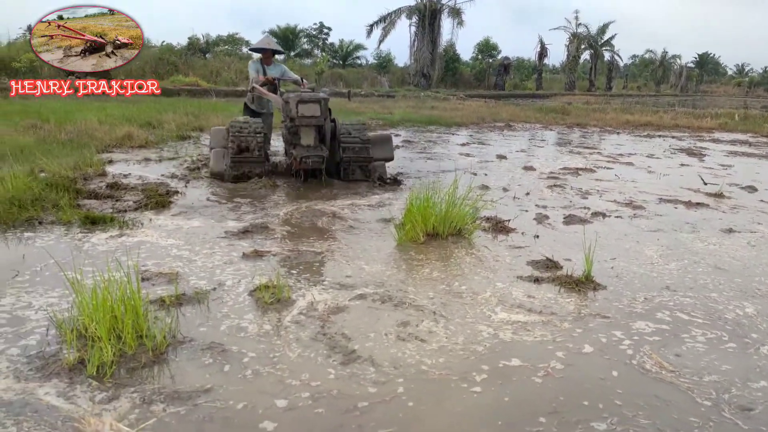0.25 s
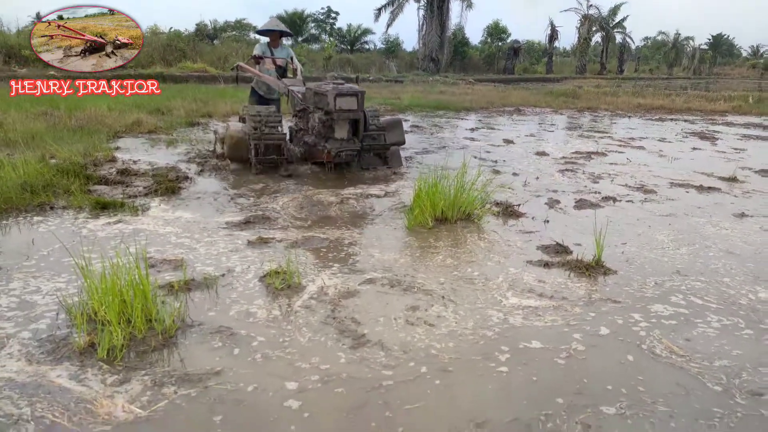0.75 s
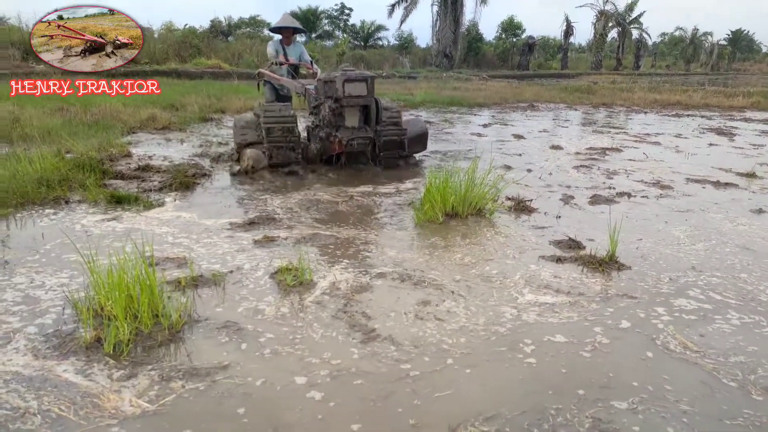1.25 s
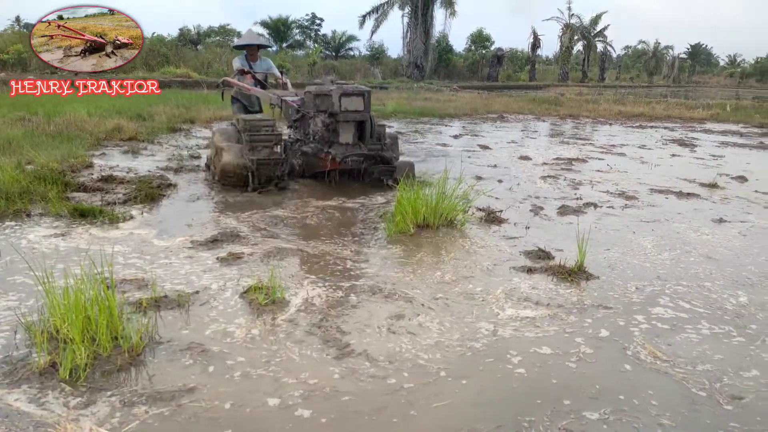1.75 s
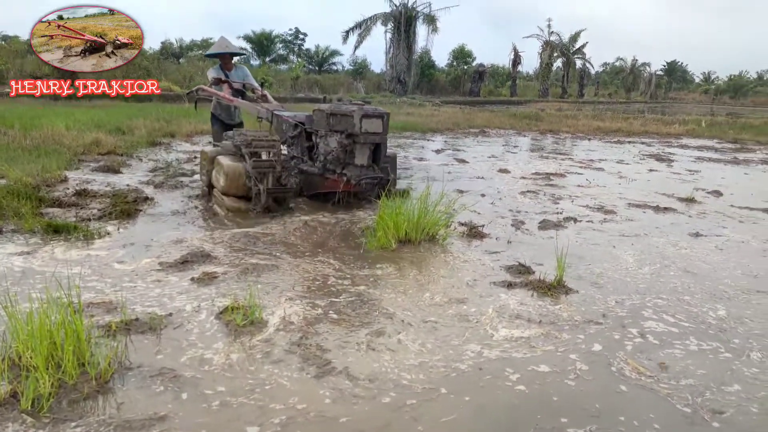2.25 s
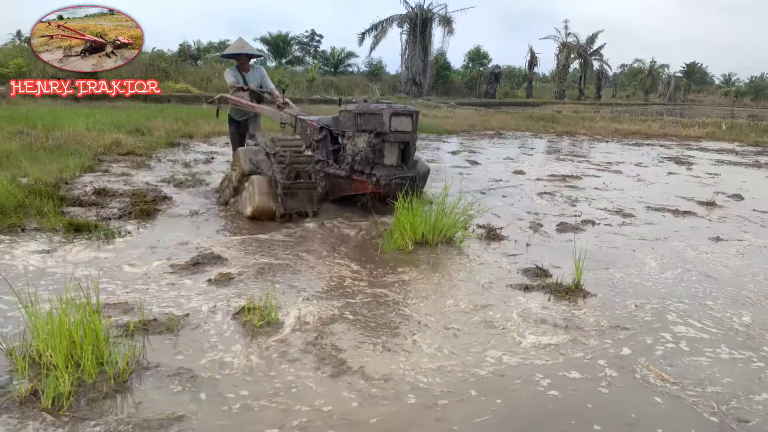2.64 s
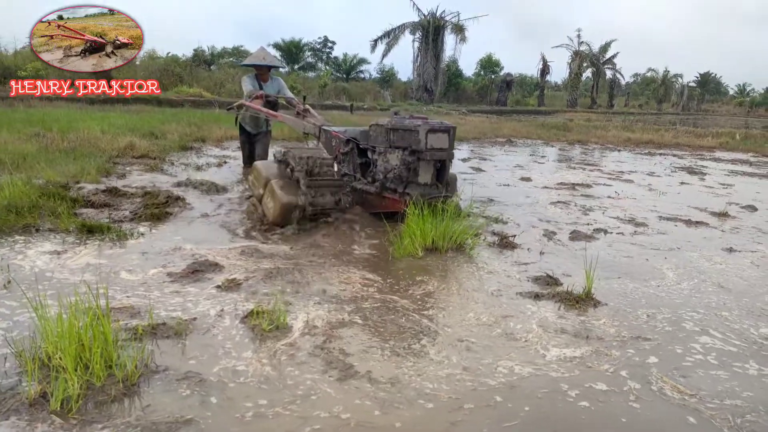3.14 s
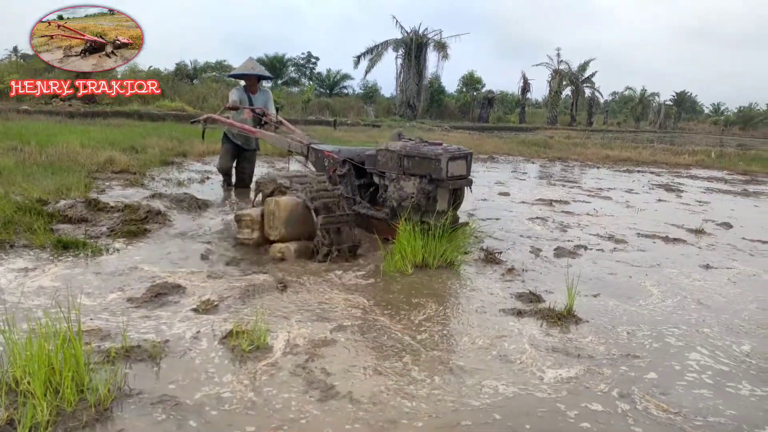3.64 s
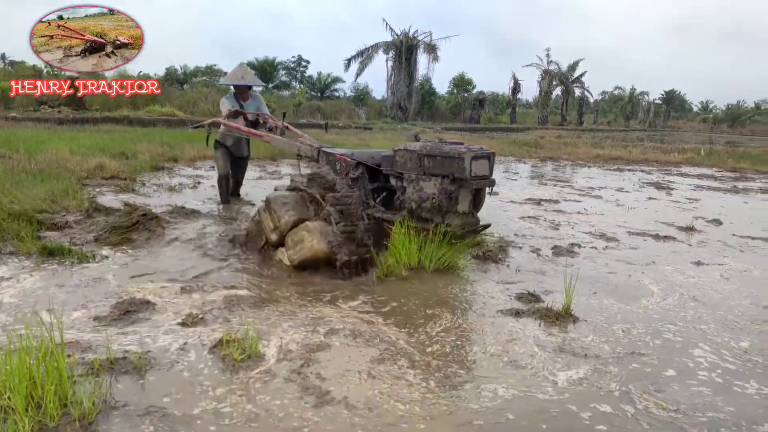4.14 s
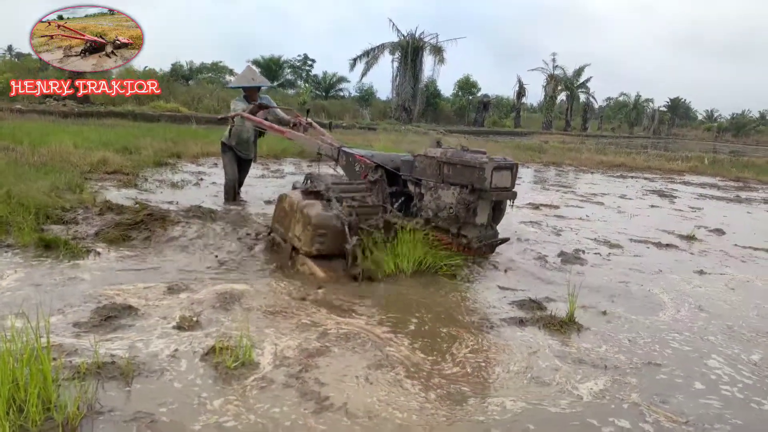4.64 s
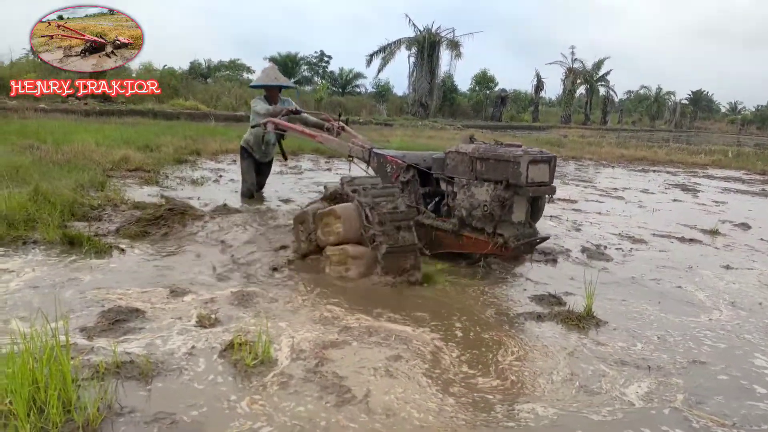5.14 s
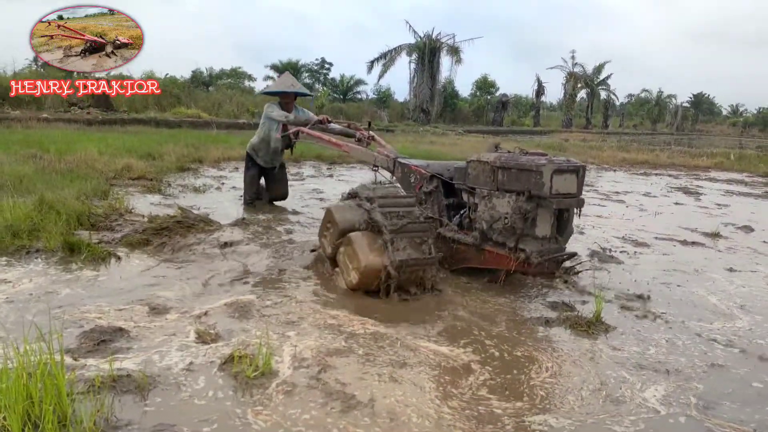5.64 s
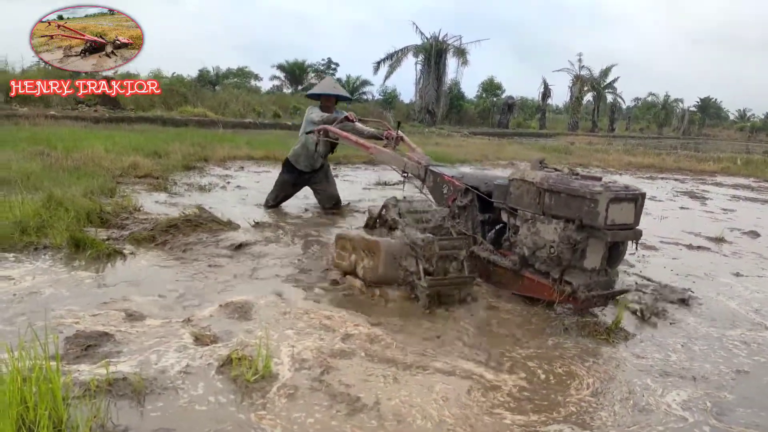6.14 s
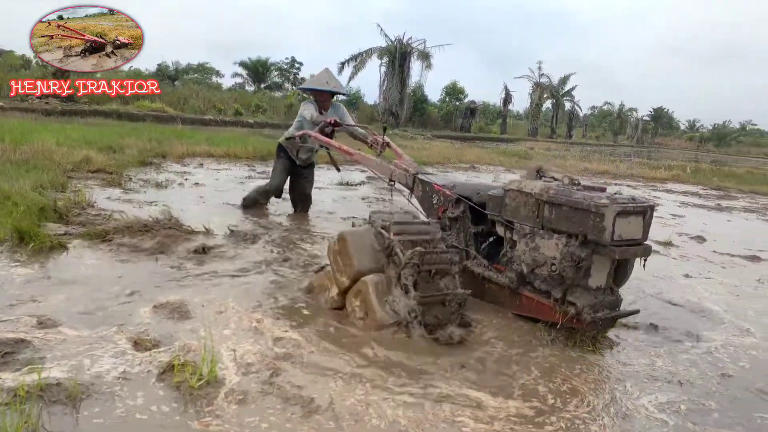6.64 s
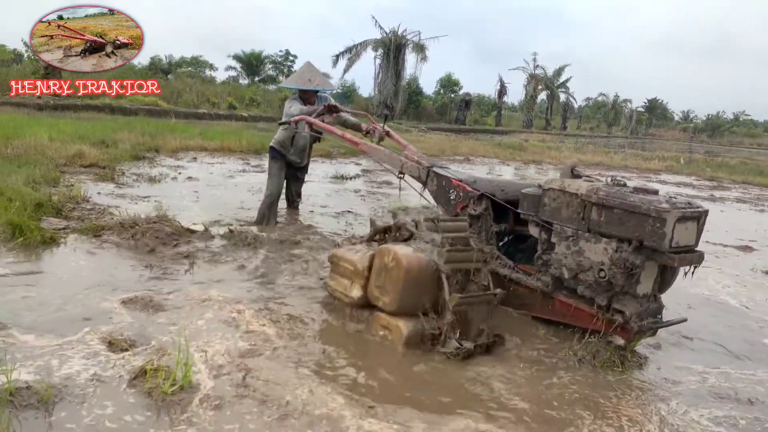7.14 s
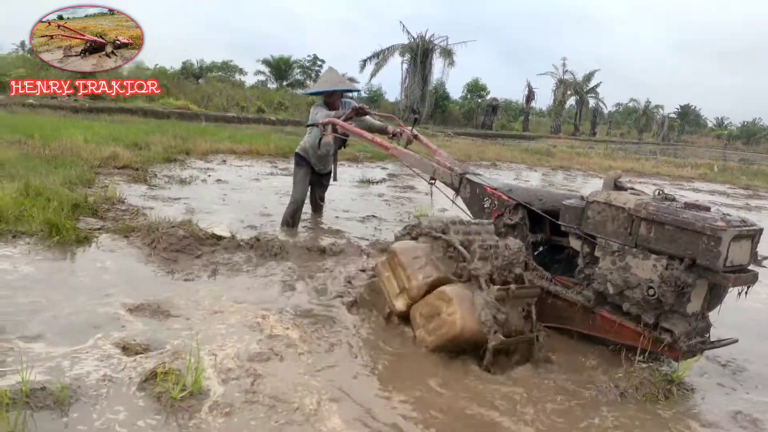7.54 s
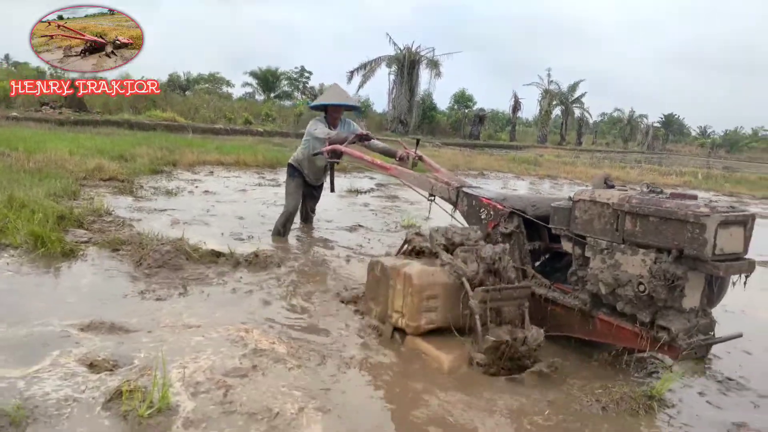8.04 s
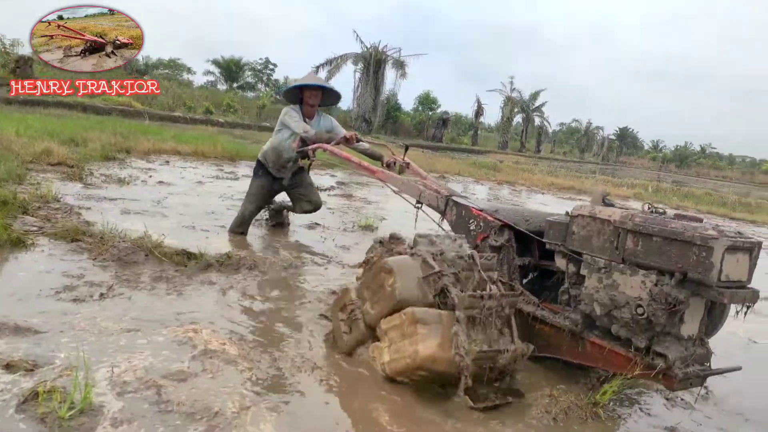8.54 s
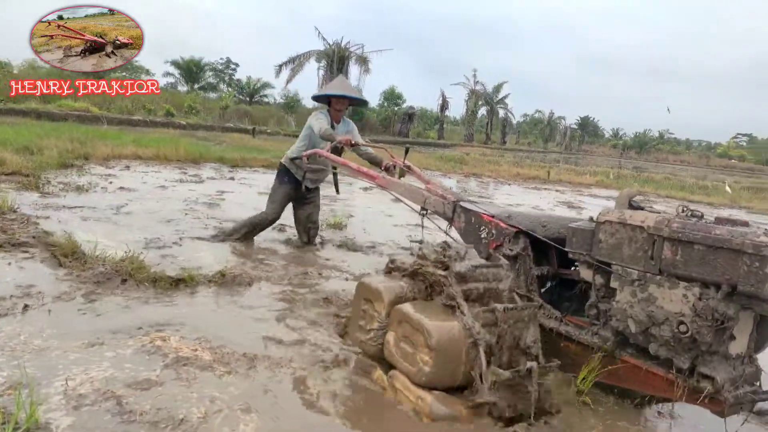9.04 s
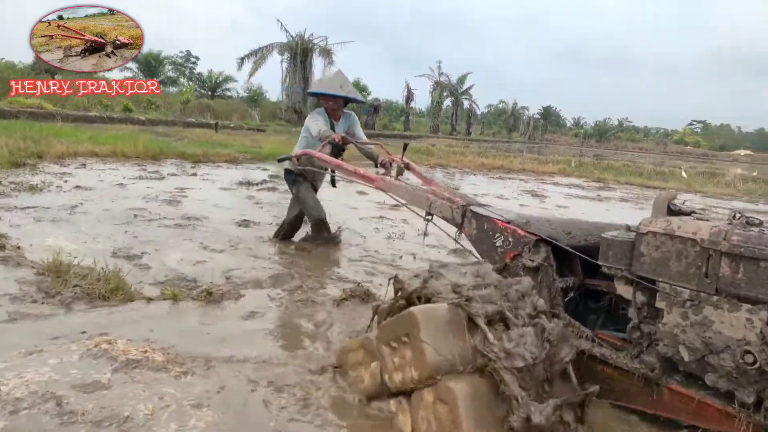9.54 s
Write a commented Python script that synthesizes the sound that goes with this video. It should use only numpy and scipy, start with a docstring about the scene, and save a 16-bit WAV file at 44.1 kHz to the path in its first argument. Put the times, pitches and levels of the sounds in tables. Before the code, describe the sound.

A rough, rapid diesel chug, about nine beats a second, runs without pause, wrapped in chattering gears, loose tin and occasional steel clinks. Wet churning and bubbling come from the paddle wheels. Around five and a half seconds the beat falls to under eight a second and the exhaust barks more heavily. The machine nears the stereo microphone in an open field, drifting slightly right, splashes growing closer.

```python
"""A flooded field: a walk-behind tractor with a one-cylinder four-stroke diesel churns towards a stereo microphone.
Each engine cycle rings the intake pipe, knocks the block, thumps the exhaust and gulps air.
The engine slows about halfway through, and the exhaust grows louder afterwards.
Gears and tinwork clatter throughout as noise crackle and damped rings; the frame clanks, small steel parts clink,
and the cage wheels throw muddy water: a filtered spray, splashes, drops and ringing bubbles."""
import sys
import numpy as np
from scipy import signal
from scipy.fft import rfft, irfft
from scipy.io import wavfile
from scipy.ndimage import uniform_filter1d, map_coordinates

SR = 44100
rng = np.random.default_rng(int(sys.argv[2]) if len(sys.argv) > 2 else 0)


def store_pcm(level_fs):
    """Save levels as 16-bit WAV."""
    pcm = np.round(np.clip(level_fs, -1, 1) * 32767).astype(np.int16)
    wavfile.write(sys.argv[1], SR, np.atleast_2d(pcm).T)


N = 431277
T = np.arange(N) / SR
BINS = np.maximum(np.fft.rfftfreq(N, 1 / SR), 1)

# crankshaft speed, throttled back halfway: (time [s], speed [turns per minute])
ENGINE_SPEED = [(0.0, 1105.2), (0.76, 1168.6), (1.03, 1176.9), (1.89, 1102.8), (2.55, 1161.8),
                (3.3, 1089.1), (3.56, 1111.8), (4.0, 1080.6), (4.75, 1076.7), (5.01, 1098.0), (5.5, 961.2),
                (6.11, 915.7), (6.45, 950.4), (6.84, 931.3), (7.84, 959.1), (8.12, 925.8), (9.26, 919.3),
                (9.78, 936.4)]


def undb(db):
    """Decibels to gain."""
    return 10 ** (np.asarray(db) / 20)


def curve(rows, axis=1):
    """One column of a time table at every sample."""
    table = np.array(rows)
    return np.interp(T, table[:, 0], table[:, axis])


def shape(points):
    """A frequency table at every bin, straight over log frequency."""
    hz, value = np.transpose(points)
    return np.interp(np.log(BINS), np.log(hz), value)


def unit(x):
    """Scale to rms 1."""
    return x / np.sqrt(np.mean(np.abs(x) ** 2))


def filtered(x, response):
    """Apply a frequency response, keeping the power of white noise."""
    return irfft(rfft(x) * unit(response), N)


def modes(rows):
    """Frequency response of a set of resonances, added with alternating sign."""
    total = 0
    for k, (hz, width_hz, db) in enumerate(rows):
        resonance = undb(db) / (1 + 1j * (BINS ** 2 - hz ** 2) / (BINS * width_hz))
        total = total + (-1) ** k * resonance
    return total


def blows(times, db, response):
    """The same response started at each time with its own strength."""
    train = np.zeros(N)
    np.add.at(train, np.clip((times * SR).astype(int), 0, N - 1), undb(db))
    return signal.fftconvolve(train, response)[:N]


def burst(rise_s, fall_s):
    """An envelope that swells and dies away; peak 1."""
    t = T[:SR // 4]
    env = (1 - np.exp(-(t / rise_s) ** 2)) * np.exp(-t / fall_s)
    return env / env.max()


def ring(hz, rise_s, fall_s):
    """A damped oscillation that starts with suction."""
    return -np.sin(2 * np.pi * hz * T[:SR // 4]) * burst(rise_s, fall_s)


def swing(hz, width_s):
    """One slow pressure swing, down then up, centred three widths after its start."""
    t = T[:SR // 4] - 3 * width_s
    return np.sin(2 * np.pi * hz * t) * np.exp(-(t / width_s) ** 2)


def walk(rate_hz):
    """A smooth random wander with a spread near 1, heading for a new value at the given rate."""
    k = int(SR / rate_hz)
    steps = np.repeat(rng.standard_normal(N // k + 1), k)
    return unit(uniform_filter1d(steps, k)[:N])


def two_ears(direct, scattered):
    """Bass reaches both microphones alike; treble arrives more and more by separate paths."""
    # scattered sound: (frequency [Hz], share of the power [0-1])
    scatter = [(150, .001), (300, .015), (700, .06), (1500, .25), (3000, .45), (6000, .62), (14000, .65)]
    share = np.clip(shape(scatter), 0, 1)
    return irfft(rfft(direct) * np.sqrt(1 - share) + rfft(scattered) * np.sqrt(share), N)


def grit(rate, spread_db, fall_s):
    """Stereo noise crackle of tiny contacts (rate per second) of very unequal size; rms 1."""
    when, size = rng.random((int(rate * N / SR), 2)).T
    power_db = -2 * spread_db * np.log(np.maximum(size, .01))
    power = blows(when * N / SR, power_db, np.exp(-2 * T[:SR // 10] / fall_s))
    noise = rng.standard_normal((3, N)) * np.sqrt(np.abs(power))
    return unit(two_ears(noise[0], noise[1:]))


def ticks(rate, spread_db):
    """Separate tiny impacts of unequal size, reaching each microphone by its own short path; rms 1."""
    when, size, left, right, side = rng.random((int(rate * N / SR), 5)).T
    push = np.sign(side - .5) * np.maximum(size, .03) ** (-spread_db * np.log(10) / 20)
    paths = np.zeros((3, N))
    # the two separate paths lag by up to a millisecond
    for path, lag_s in zip(paths, (0 * left, left / 1000, right / 1000)):
        np.add.at(path, (when * N + lag_s * SR).astype(int) % N, push)
    return unit(two_ears(paths[0], paths[1:]))


def pings(times, db, hz, fall_s, glide=0):
    """Short stereo rings, each with its own time, strength, pitch, decay and rise in pitch."""
    t = T[:SR // 30]
    out = np.zeros((3, N + len(t)))
    turn = np.exp(2j * np.pi * rng.random((len(times), 3)))  # a chance phase for each path
    for s, gain, f, fall, ears in zip(times, undb(db), hz, fall_s + 0 * times, turn):
        i = int(np.clip(s * SR, 0, N))
        bend = 1 + glide * np.minimum(t / fall, 6)
        onset = 1 - np.exp(-2 * f * t)
        z = np.exp(2j * np.pi * f * t * bend - t / fall) * onset
        out[:, i:i + len(t)] += gain * (ears[:, None] * z).imag
    return two_ears(out[0, :N], out[1:, :N])


def stroke(angle, scatter_db, jitter_s):
    """Times at which the four-stroke cycle passes an angle, and a chance strength for each.

    Angles are shares of a cycle after the intake valve shuts; one cycle takes two turns."""
    start = .6825  # angle at time zero
    cycles = start + np.cumsum(curve(ENGINE_SPEED)) / (2 * 60 * SR)
    times = T[1:][np.diff(np.floor(cycles - angle)) > 0]
    chance = rng.standard_normal((len(times), 2))
    return times + jitter_s * chance[:, 0], scatter_db * chance[:, 1]


def approach(start_db, near_db):
    """Relative level [dB] of a part, changing by near_db for each halving of the distance."""
    # the tractor comes closer to the microphone: (time [s], distance [m])
    distance = [(0, 3.23), (5, 2.85), (9.78, 1.34)]
    return start_db + near_db * np.log2(distance[0][1] / curve(distance))


def tinwork():
    """Narrow ringing tones within the clatter, struck at random; pitch wanders and varies by strike; rms 1."""
    # narrow ringing tones, the highest ones faint: (pitch [Hz], decay [s], relative level [dB])
    tones = [(1232, 0.0062, 3), (1609, 0.014, -1.5), (1953, 0.0073, 1.5), (2740, 0.013, -4.5),
             (3910, 0.0045, -4.5), (4190, 0.0052, -7), (5670, 0.0053, -8), (7000, 0.0074, -15.5)]
    rate, spread_db = 45, 1  # strikes of each tone per second, spread of their strength
    wander, detune = .02, .017  # slow wander and strike-to-strike range of pitch (share)
    out = 0
    for hz, fall_s, db in tones:
        when, size, pitch = rng.random((int(rate * N / SR), 3)).T
        flex = wander * walk(1.5)[(when * N).astype(int)]
        strike_db = db - spread_db * np.log(np.maximum(size, .08))
        strike_hz = hz * (1 + flex + detune * (2 * pitch - 1))
        out = out + pings(when * N / SR, strike_db, strike_hz, fall_s)
    return unit(out)


def clatter():
    """Gears, chain and tinwork chatter after each firing and settle during compression; the frame rumbles."""
    # colour of the gear train: (frequency [Hz], relative level [dB])
    drive_colour = [(120, -49), (200, -5), (273, -9), (345, -29), (544, -5.5), (630, -6.5), (783, -4.5),
                    (940, -12), (1190, -8), (1780, -13.5), (1910, -8.5), (3010, -15.5), (4100, -13.5),
                    (8500, -46.5), (15500, -45)]
    # colour of the frame's rumble: (frequency [Hz], relative level [dB])
    rumble_colour = [(20, -16), (45, -9), (100, -7), (230, -4), (310, 1.5), (420, -16.5), (900, -35)]
    # the jolt comes just after the firing, the lull early in the cycle
    jolt = 1.05 + 0.45 * blows(*stroke(.225, 1.5, 0.0022), burst(0.003, 0.084))
    lull = 1 - .27 * blows(*stroke(.02, .5, .001), burst(.007, .014))
    pace_db = 2 * np.log2(curve(ENGINE_SPEED) / 930)  # 2 dB for each doubling, none at 930 turns per minute
    flutter_db = 1.6 * walk(40)
    shake = undb(approach(-27.5, 1.6) + pace_db + flutter_db) * jolt * lull
    gears = undb(-0.5) * grit(200, 2, 0.006)
    chain = undb(-4.5) * ticks(300, 2.0)
    drive = filtered((gears + chain) * shake, undb(shape(drive_colour)))
    tin = tinwork() * shake
    rumble = filtered(grit(300, 3.1, 0.016), undb(shape(rumble_colour)))
    return drive + undb(-2.5) * tin + undb(-30.0) * rumble


def bubbles(rate, middle_hz, octaves, cycles):
    """Air pockets of many sizes plop, ring for some cycles and rise a little in pitch; rms 1."""
    when, size, a, b = rng.random((int(rate * N / SR), 4)).T
    hz = middle_hz * 2 ** (2 * octaves * (a - b))
    db = -4 * np.log(np.maximum(size, .05)) - 7 * np.maximum(np.log2(hz / 3500), 0)
    # thick mud lets the pitch rise only a little
    return unit(pings(when * N / SR, db, hz, cycles / hz, glide=.012))


def water():
    """The cage wheels stir an uneven, gurgling spray, throw a splash where a paddle digs in, and shed drops."""
    # how hard the wheels churn the water: (time [s], relative level [dB])
    churn = [(0, 2), (.45, -11), (.7, 3), (1.4, 3), (2, 7), (2.5, 4), (2.85, 0.5), (3.3, -8), (3.45, 7),
             (4, 3), (4.8, 6), (5.1, 12), (5.3, 0), (5.55, 12.5), (5.9, 3), (6.3, 4), (6.6, 4), (6.8, 2),
             (7.2, 5), (7.85, 4.5), (8.4, 3.5), (9, 2), (9.78, 0.5)]
    # splashes as the wheel paddles dig in: (time [s], relative level [dB], decay [s])
    digs = [(0.433, -22, 0.03), (2.615, -20.5, 0.013), (2.973, -25, 0.057), (3.199, -18.5, 0.017),
            (3.342, -29, 0.055), (3.795, -35, .01), (4.013, -27, 0.0096), (4.38, -23, 0.028),
            (4.608, -18, 0.031), (5.097, -27, 0.11), (5.528, -20.5, 0.0087), (5.638, -25, 0.012),
            (5.747, -19, 0.05), (5.959, -14.5, 0.026), (6.039, -23, 0.011), (6.37, -19, 0.027),
            (6.498, -18, 0.013), (6.739, -18, 0.027), (7.391, -19, 0.023), (7.516, -19.5, 0.019),
            (7.564, -18, 0.013), (7.679, -19, 0.0065), (7.785, -17, 0.05), (8.077, -21, 0.037),
            (8.264, -27, 0.038), (8.684, -10.5, 0.02), (8.787, -20, 0.019), (9.141, -22, 0.011),
            (9.392, -19.5, 0.014), (9.473, -36, 0.0079), (9.487, -17, 0.013), (9.62, -15.5, 0.014)]
    # colour of the spray, splashes and drops: (frequency [Hz], relative level [dB])
    wash_colour = [(1500, 5), (3500, 9.5), (5800, 6.5), (8200, -10), (10200, -5), (12500, -14),
                   (15000, -37)]
    spray = undb(approach(-37, 6.5) + curve(churn) + 1.4 * walk(16))
    splashes = 0
    for s, db, length_s in digs:
        splashes = splashes + blows(np.array([s]), db, burst(0.4 * length_s, length_s))
    mist = undb(-4) * grit(450, 3.3, 0.017) * spray
    drops = undb(-12.5) * spray * grit(27, 6, 0.0082)  # few and unequal, falling back on the water
    slop = undb(-2.5) * grit(600, 1.3, .0025) * splashes
    # air pockets closing in the mud
    gurgle = undb(0.5) * spray * bubbles(rate=170, middle_hz=2306, octaves=.9, cycles=15.6)
    # each splash breaks into short wet plops
    plops = undb(-1) * splashes * bubbles(rate=600, middle_hz=3600, octaves=.5, cycles=9)
    return filtered(mist + slop + drops, undb(shape(wash_colour))) + gurgle + plops


def intake():
    """The shut valve leaves the air pipe ringing with a weaker upper tone; when it opens, the gulp dies quickly."""
    times, db = stroke(0, 0.39, .0001)
    low_tone = blows(times, db, ring(175.0, 0.0017, 0.036))
    high_tone = undb(-19) * blows(times, db, ring(275.9, 0.0012, 0.041))
    shut = low_tone + high_tone
    gulp = blows(*stroke(.742, 0.67, 0.00045), ring(189, 0.0079, 0.0022))
    # the small mouth of the pipe radiates ever less below 118 Hz
    mouth = 1 / np.sqrt(1 + (118 / BINS) ** 8)
    pipe = irfft(rfft(undb(5.5) * shut + undb(6) * gulp) * mouth, N)
    return undb(approach(-14.5, -0.5)) * pipe


def knock():
    """Combustion cracks against the block, whose rings start one after another; the casing rattles on."""
    # rings of one knock, starting one after another, the lowest pitch last:
    # (lag [s], pitch [Hz], decay [s], relative level [dB])
    knock_rings = [(0, 1930, 0.0034, -1), (.001, 1170, 0.0035, -3.5), (.002, 645, 0.0044, -9),
                   (.0028, 3560, 0.0026, -9.5), (.004, 1560, 0.0015, 2.5), (.007, 1100, 0.0045, -3),
                   (.008, 740, 0.0094, -13.5), (.013, 517, 0.0072, -13)]
    # resonances of the engine block: (frequency [Hz], width [Hz], relative level [dB])
    block = [(483, 40, -4), (740, 53, -12), (1075, 670, -4.5), (1700, 190, -3.5), (1804, 55, 2.5),
             (2360, 1140, -9), (3840, 115, -10)]
    # how hard the diesel knocks: (time [s], relative level [dB])
    hardness = [(0.06, 2.5), (0.38, 3.5), (0.48, 1), (0.6, 2.5), (1.1, 5), (1.73, 4.5), (2.2, -1), (2.5, 4),
                (2.7, 1.5), (3.44, 4), (4.2, -2), (4.65, 3.5), (4.98, -0.5), (5.4, 0), (6.1, 5), (6.6, 1.5),
                (7.1, 1.5), (7.49, 1), (7.62, 3), (7.74, 4.5), (7.9, -2.5), (8.12, 0), (8.25, 1), (8.51, 0),
                (8.64, 3), (8.9, 2.5), (9.42, 4.5), (9.7, 5)]
    times, db = stroke(.203, .6, .0004)
    # the knock comes later when the engine turns slowly
    times = times + .0019 * np.interp(times, T, (1130 - curve(ENGINE_SPEED)) / 200)
    rings = 0
    for lag_s, hz, fall_s, ring_db in knock_rings:
        late, size, pitch = rng.standard_normal((len(times), 3)).T
        ring_times = times + lag_s + .0004 * late
        rings = rings + pings(ring_times, db + ring_db + 1.0 * size, hz * (1 + .08 * pitch), fall_s)
    rattle = blows(times, db, burst(.004, .011)) * grit(1500, 0.9, 0.0019)
    # the first crack leads the ringing block
    crack_db = db + np.interp(times, T, approach(-18, 4.8))
    snap = blows(times - .0006, crack_db, burst(.002, .0038)) * grit(1400, 1.0, 0.00062)
    crack_colour = [(600, -4), (1800, 6), (3600, 5), (6000, -11), (8500, -27), (15000, -44)]
    crack = filtered(snap, undb(shape(crack_colour)))
    mix = undb(3.5) * rings + undb(-4.5) * filtered(rattle, modes(block)) + undb(-2.5) * crack
    return undb(approach(-14.5, 2.5) + curve(hardness)) * mix


def clinks():
    """Small steel parts strike with a bright tick and ring briefly, each around its own pitch."""
    # sharp metal clinks: (time [s], relative level [dB], pitch [Hz], bright tick against the ring [dB])
    strikes = [(0.065, -15, 3400, -9), (0.59, -9, 1980, -27), (1.001, -9, 2100, -30), (1.33, -7, 3730, -18),
               (2.59, -5.5, 2550, -24), (3.392, -14, 2430, -16), (3.405, -3, 2430, -23),
               (4.112, -6.5, 3650, -17), (4.129, -14, 3600, -9), (4.399, -20.5, 3460, 1.5),
               (4.605, -11.5, 2370, -6), (5.846, -5, 4180, -12), (6.191, -9, 2700, -20),
               (6.192, -6.5, 5170, -14), (6.2473, -6, 1490, -13), (6.344, -5, 1580, -28),
               (6.598, -5, 1890, -23), (6.982, -7, 1590, -18), (7.772, -8.5, 3680, -12),
               (8.488, -6.5, 3270, -30), (8.489, -18, 5200, -27), (8.514, -6, 3480, -22),
               (8.643, -7, 2160, -16), (8.6772, -13, 3270, -16), (8.69, -15, 3400, -16),
               (8.715, -9, 3330, -22), (9.5533, -11, 3170, -10), (9.683, -13, 2870, -11)]
    s, db, hz, bright_db = np.transpose(strikes)
    tone = 0
    for ratio, part_db in [(.93, -1.5), (1.08, 0), (1.45, -15)]:
        tone = tone + pings(s + 0.0014, db + part_db, ratio * hz, .003)
    contact = grit(4500, 1, 0.0006) * blows(s, db + bright_db, burst(.0005, .0035))
    tick_colour = [(2000, -14), (4500, 4), (6300, 8), (8200, -7), (10500, -17), (15000, -14)]
    tick = filtered(contact, undb(shape(tick_colour)))
    return undb(-0.5) * tone + undb(1.5) * tick


def exhaust():
    """The silencer lets out a low thump, a pop and a puff of gas per cycle; the rest of the gas hisses after it."""
    # load on the engine; it dips where the speed falls off and is higher afterwards:
    # (time [s], relative exhaust level [dB])
    load = [(0.1, -25), (1.1, -27), (1.24, -31), (1.75, -25.5), (2.9, -27), (3.37, -26), (4.7, -26),
            (5.2, -31), (6.35, -20.5), (6.64, -24.5), (7.8, -22.5), (8.55, -21.5), (9.6, -21)]
    load_db = curve(load)
    times, db = stroke(.475, 1, 0.0021)
    thump = blows(times - .0165, db, swing(72.3, 0.0082))
    thump = thump + undb(-6.5) * blows(times + 0.0119, db, ring(95.0, 0.0057, 0.0038))
    puff = undb(0.88 * load_db - 9.0) * blows(times - .001, 2 * db + 6.5, burst(.0042, .009))
    gas_colour = [(200, -5), (700, -33), (4000, 20.0), (7500, -10.0), (10000, 1), (15000, -17.0)]
    gas = filtered(puff * grit(2200, 0.99, 0.001), undb(shape(gas_colour)))
    # the piston pushes the rest of the gas out after the puff
    hiss = undb(-32.5) * blows(times + 0.0065, db, burst(0.0075, 0.015))
    tail_colour = [(1500, -1), (4000, 9), (6000, 15), (8200, -16), (10500, 1), (15000, -36)]
    tail = filtered(hiss * grit(2000, 0.81, 0.0018), undb(shape(tail_colour)))
    bark = undb(load_db - 0.5) * blows(times, db, burst(0.0012, 0.012))
    pop_colour = [(300, -10), (700, 5), (1400, 4), (4000, -8), (9000, -19.5)]
    pop = filtered(bark * grit(1500, 1, 0.00086), undb(shape(pop_colour)))
    return undb(load_db + 12.0) * thump + pop + gas + tail


def frame():
    """Loose joints take up their play with dull clanks; the heavy ones make the hollow frame boom."""
    # clanks of the frame and hitch: (time [s], relative level [dB], low body against the clank [dB])
    joints = [(0.379, -20, 6), (1.826, -21.5, 4), (2.221, -36, -1), (2.841, -16.5, -24), (3.335, -29, -22),
              (3.39, -19, -1), (4.368, -17.5, -6), (4.653, -22, -10), (4.697, -18.5, 2), (5.687, -25.5, 6),
              (5.942, -15.5, -34), (6.201, -16.5, -13), (6.245, -24, -25), (6.443, -19, -6),
              (6.775, -14.5, 1), (7.775, -19.5, -14), (8.257, -15, -22), (8.801, -19, -20),
              (8.844, -16.5, -23), (9.035, -16, -21), (9.124, -15.5, -24), (9.304, -20, -11),
              (9.414, -15, -22), (9.599, -14, -42)]
    s, db, body_db = np.transpose(joints)
    contact = blows(s, db, burst(0.0014, 0.033)) * grit(2500, 0.59, 0.0012)
    clank_colour = [(150, -11.0), (500, 1), (1300, 3.5), (3000, -1.0), (9000, -24.0)]
    clank = filtered(contact, undb(shape(clank_colour)))
    body = blows(s, db + body_db, burst(0.0037, 0.013)) * grit(1700, 1.0, 0.0013)
    boom_colour = [(120, -24), (260, 11), (420, -13.0), (600, -1), (1000, -9), (3000, -61)]
    boom = filtered(body, undb(shape(boom_colour)))
    hum = blows(s + 0.0031, db + body_db, ring(232, 0.0065, 0.015))
    return undb(2.5) * clank + undb(4.0) * boom + undb(-2.5) * hum


def scene():
    """All parts travel together, so the lag between the microphones follows the tractor's bearing."""
    # direction of the tractor: (time [s], lag of the left microphone [ms])
    bearing = [(0, .06), (2.7, .04), (5, -.06), (6.3, -.12), (8.5, -.15), (9.78, -.23)]
    left, right = clatter() + water() + intake() + knock() + clinks() + exhaust() + frame()
    late = np.arange(N) - curve(bearing) * SR / 1000
    return np.array([map_coordinates(left, [late], order=3, mode="nearest"), right])


def record(dry):
    """Each microphone has its own colour and sheds the deepest bass; peaks past full scale clip, the top is cut."""
    # balance of the pair: (frequency [Hz], left minus right [dB])
    balance = [(600, .2), (1100, -2.5), (1800, -3.5), (2600, -1), (5000, 1.5), (7000, 1), (11000, -1.5),
               (15000, -6)]
    colour = undb(shape(balance) * np.array([[.5], [-.5]]))
    microphones = colour / np.sqrt(1 + (30 / BINS) ** 6)
    heard = np.clip(irfft(rfft(dry) * microphones, N), -1, 1)
    top_cut = signal.ellip(10, .2, 80, 15350, fs=SR, output="sos")  # low-pass at 15350 Hz
    return signal.sosfilt(top_cut, heard)


dry = scene()
out = record(dry)
store_pcm(out)
```